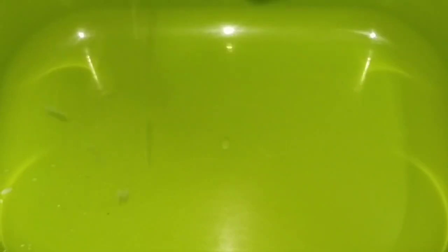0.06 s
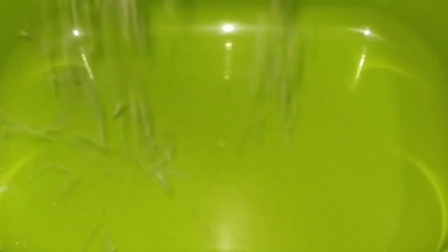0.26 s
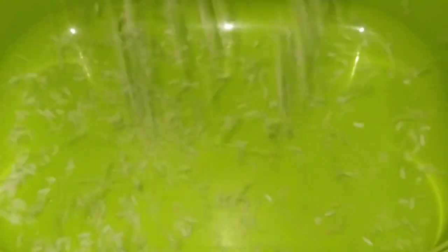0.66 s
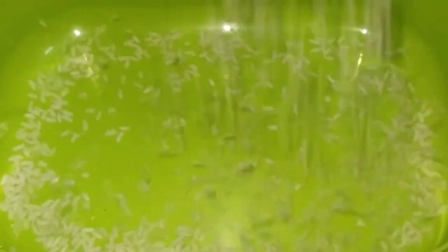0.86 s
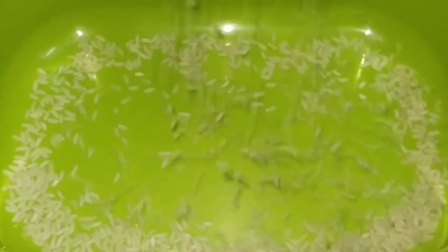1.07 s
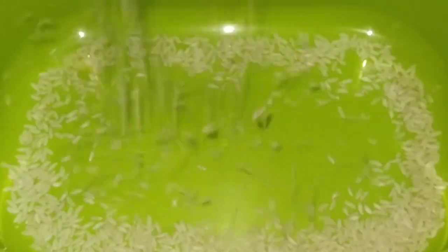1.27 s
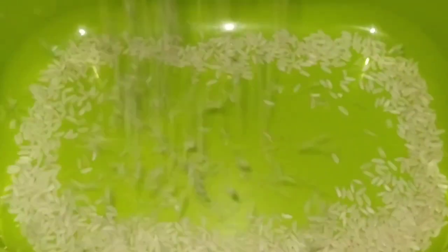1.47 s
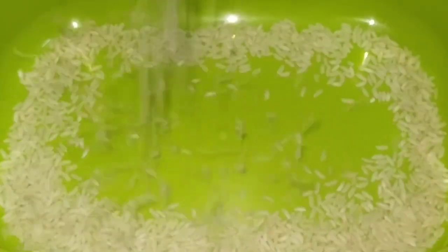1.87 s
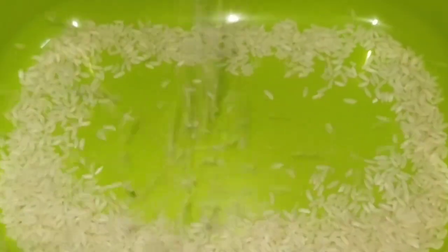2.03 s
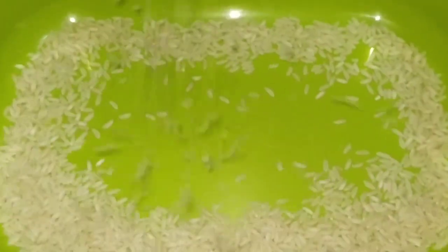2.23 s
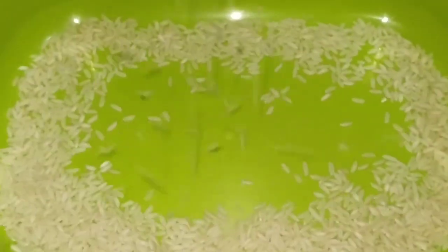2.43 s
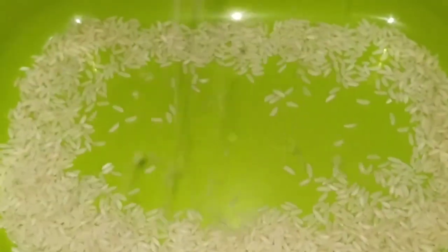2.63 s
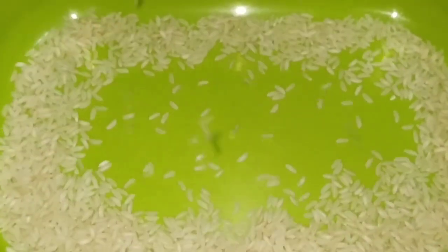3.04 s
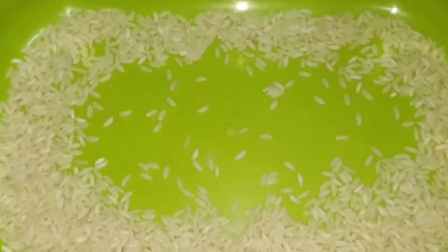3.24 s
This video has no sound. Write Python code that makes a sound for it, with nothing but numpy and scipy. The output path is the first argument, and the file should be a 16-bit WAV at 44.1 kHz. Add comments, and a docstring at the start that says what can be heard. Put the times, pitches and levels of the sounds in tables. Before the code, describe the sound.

Rice grains rattle into a plastic container in a rush that dwindles to separate clicks.

```python
"""A small room: dry rice is poured into a plastic tub, heard from close by.
A few grains tick on the bare bottom, the stream thickens to a rattling rush, then thins to clumps
and stragglers. Each impact clicks and rings the tub's modes, which the growing heap damps.
Grains also click against each other, and the tub takes a few hard knocks.
Underneath are a low room rumble and, late on, a faint hum."""
import sys
import numpy as np
from scipy import signal
from scipy.io import wavfile

SR = 44100
rng = np.random.default_rng(int(sys.argv[2]) if len(sys.argv) > 2 else 0)


def unload_wav(signal):
    """Save mono or channel-first audio to the path in sys.argv[1] as 16-bit WAV at rate SR, clipped to [-1, 1]."""
    wavfile.write(
        sys.argv[1],
        SR,
        np.round(np.clip(np.atleast_2d(signal).T, -1, 1) * 32767).astype(np.int16),
    )


N = 149940
T = np.arange(N) / SR
RING_T = np.arange(6000) / SR

# Room rumble. Each row: frequency in Hz, relative density in dB.
RUMBLE_SPECTRUM = [(25, -35), (70, -15.5), (150, 6.5), (290, -0.5), (1000, -9.5), (3000, -52), (8000, -69)]
# Each row: time in seconds, rumble level in dB.
RUMBLE_LEVEL = [(.03, -95), (.07, -79), (.12, -62.5), (.4, -54.5), (1.2, -64.5), (2.4, -55), (3.4, -52.5)]
# Knocks on the tub. Each row: start in seconds, thud peak in dB, snap peak in dB.
KNOCKS = [(1.456, -17, -40), (1.71, -15, -22), (1.8478, -19, -11), (2.8099, -10.5, -3.5),
          (2.8468, -15, -29)]
# A knock's thud and snap; a soft bump. Each row: frequency in Hz, relative density in dB.
THUD_SPECTRUM = [(30, -75), (150, -17), (650, -0.5), (1000, 4), (2400, -4), (9000, -22)]
SNAP_SPECTRUM = [(2000, -4.5), (5200, -6), (6700, 6), (8600, -19.5), (12200, 5.5), (14000, -14), (15500, 1)]
BUMP_SPECTRUM = [(20, -23), (120, -2), (450, -5), (3000, -48)]
# Each row: frequency in Hz, bare gain in dB, bare T60 in seconds, gain change when filled in dB.
TUB_MODES = [(283.5, -31.5, 0.13, 5), (777, -15, 0.05, -13.5), (1061, -4, 0.023, -2),
             (1275, 1.5, 0.021, -3), (1609, 1.5, 0.015, 2), (1975, 0.5, 0.012, 0.5), (2159, 4, 0.019, -3),
             (2400, 6, 0.0081, 0.5), (2857, 4.5, 0.0096, 1), (3410, -4, 0.011, 0.5),
             (3800, -9.5, 0.013, -6), (5090, -8.5, 0.0066, 1.5), (6350, -5.5, 0.0073, 0)]
# Grain on plastic; hard first contact; grain on grain. Each row: frequency in Hz, relative density in dB.
CLICK_SPECTRUM = [(100, -33), (400, -5), (900, 8.5), (2500, 11.5), (4500, 7), (6700, -3.5), (8200, -8),
                  (11300, -4.5), (15500, -3)]
CONTACT_SPECTRUM = [(550, -23.5), (1200, 3), (2600, 0.5), (6700, -18), (8200, -31), (11500, -21.5)]
RICE_SPECTRUM = [(2000, -9.5), (5000, -13.5), (6500, -14.5), (8200, -21), (10000, -19), (11300, -11),
                 (12500, -18), (15500, -13.5)]
# Grains and small clumps that stand out.
# Each row: start in seconds, peak before the low cut in dB, spot pitch in Hz, contact over ring in dB.
TAPS = [(0.0932, -28.5, 1270, -15), (.169, -24.5, 2770, -10), (.208, -21, 2080, -11),
        (.2135, -17.5, 2220, -7), (.239, -24, 1370, -7), (.25, -20, 1900, -14), (0.293, -28, 1320, 10),
        (.306, -19.5, 1350, 1), (0.335, -16, 1260, -1), (.356, -13.5, 2160, -7), (2.227, -15.5, 1260, 4),
        (2.2865, -9.5, 1390, 2), (2.3504, -22, 1550, 4), (2.4134, -11.5, 1590, 7), (2.554, -21, 1290, -10),
        (2.611, -16, 2080, 0), (2.639, -22, 2050, -7), (2.668, -21, 2150, -10), (2.683, -15, 1590, 3),
        (2.726, -27, 1980, -10), (2.7676, -19, 2160, -11), (2.82, -18.5, 2200, -3), (2.84, -14.5, 1580, 3),
        (2.8575, -14.5, 2700, 4), (2.9373, -16, 2200, -1.5), (2.947, -13, 1960, 8), (2.971, -21, 2150, -2),
        (3.01, -27, 2000, -1), (3.06, -19.5, 2010, -11), (3.0975, -20.5, 2150, -2), (3.113, -21, 1310, -8),
        (3.169, -30, 1670, 3), (3.2082, -24, 2080, 4), (3.2319, -25, 1640, 8), (3.3102, -31.5, 2400, -9),
        (3.33, -22.5, 1340, 5)]
# Stream on the tub; rice on rice. Each row: time in seconds, level before the low cut in dB.
STREAM_LEVEL = [(.24, -105), (.295, -58), (.335, -35), (.365, -29), (.41, -26.5), (.44, -26), (.475, -23.5),
                (.55, -27), (.585, -25), (.62, -27), (.715, -24), (.785, -30), (.82, -27), (.9, -28.5),
                (1.04, -26), (1.33, -29.5), (1.52, -28.5), (1.63, -26), (1.8, -30), (2.04, -29),
                (2.17, -28), (2.26, -31.5), (2.38, -29), (2.44, -33), (2.475, -27), (2.5, -33), (2.58, -37),
                (2.79, -36), (2.86, -29.5), (2.925, -38.5), (2.945, -29.5), (2.99, -30), (3.03, -33),
                (3.11, -39.5), (3.17, -43), (3.28, -51), (3.4, -56)]
RICE_LEVEL = [(.25, -105), (.33, -48), (.55, -48), (1.05, -45.5), (1.4, -49), (2.42, -44.5), (2.7, -51),
              (3.1, -48.5), (3.3, -77)]
# Each row: time in seconds, impacts on the tub per second.
IMPACT_RATE = [(.3, 670), (.45, 1770), (.9, 2000), (1.8, 1490), (2.7, 450), (3.3, 290)]
# Room decay. Each row: frequency in Hz, T60 in seconds.
ROOM_DECAY, ROOM_DB = [(200, 0.1), (2000, 0.57), (8000, 0.87), (16000, 0.038)], -20.5

FILL_START_S, FILL_S, FILL_DAMPING = 0.41, 1.67, 0.13
DETUNE_BARE, DETUNE_FILLED = 0.048, 0.087  # the heap makes pitch depend more on the spot struck
SPOT_HZ, SPOT_SPREAD_OCT, SPOT_WIDTH_OCT, SPOT_DB = 1690, 0.69, 0.14, 6.5


def amp(db):
    """Decibels to gain."""
    return 10 ** (np.asarray(db) / 20)


def unit_rms(x):
    """Scales to rms 1."""
    return x / np.sqrt(np.mean(x ** 2) + 1e-20)


def unit_energy(x):
    """Scales to energy 1."""
    return x / np.linalg.norm(x)


def at_peak(x, db):
    """Scales to a peak level."""
    return amp(db) * x / abs(x).max()


def curve(points):
    """Time table at every sample."""
    return np.interp(T, *np.transpose(points))


def at_hz(points, hz):
    """Table lookup on a log-frequency axis."""
    table_hz, value = np.transpose(points)
    return np.interp(np.log(hz + 1), np.log(table_hz), value)


def add(mix, start_s, sound):
    """Mixes a sound in at a time."""
    part = mix[round(start_s * SR):][:len(sound)]
    part += sound[:len(part)]


def colour(x, spectrum):
    """Minimum-phase filter with the given spectrum."""
    hz = abs(np.fft.fftfreq(2048, 1 / SR))
    log_gain = np.log(amp(at_hz(spectrum, hz)))
    fir = np.fft.ifft(np.exp(np.conj(signal.hilbert(log_gain)))).real
    return signal.fftconvolve(x, fir[:len(fir) // 2])[:len(x)]


def decay(t60_s):
    """Exponential envelope."""
    return np.exp(-np.log(1000) * RING_T / t60_s)


def click(spectrum, t60_s):
    """Coloured noise burst of energy 1."""
    return unit_energy(colour(rng.standard_normal(len(RING_T)) * decay(t60_s), spectrum))


def pulse(spectrum, peak_db):
    """One push: a coloured impulse."""
    return at_peak(colour(signal.unit_impulse(len(RING_T)), spectrum), peak_db)


def background(hum_hz=59.3, hum_db=-72.5, hum_start_s=2, hum_rise_s=.15):
    """Low room rumble and a faint, late hum."""
    rumble = amp(curve(RUMBLE_LEVEL)) * unit_rms(colour(rng.standard_normal(N), RUMBLE_SPECTRUM))
    fade_in = np.clip((T - hum_start_s) / hum_rise_s, 0, 1)
    hum = fade_in * unit_rms(np.sin(2 * np.pi * hum_hz * T))
    return rumble + amp(hum_db) * hum


def room(x):
    """Diffuse tail; the bass and the very top die first."""
    hz, t, noise = signal.stft(rng.standard_normal(SR // 2), SR, nperseg=256)
    t60_s = at_hz(ROOM_DECAY, hz)[:, None]
    tail = signal.istft(noise * np.exp(-np.log(1000) * t / t60_s), SR)[1]
    return signal.fftconvolve(x, unit_energy(tail))[:N]


def knocks(bump_s=.2502, bump_db=-30.5):
    """Hard knocks, each a dull thud and a bright snap, and one soft bump of the whole tub."""
    out = np.zeros(N)
    for start_s, thud_db, snap_db in KNOCKS:
        add(out, start_s, pulse(THUD_SPECTRUM, thud_db) + pulse(SNAP_SPECTRUM, snap_db))
    add(out, bump_s, pulse(BUMP_SPECTRUM, bump_db))
    return out


def tub_ring(spot_hz, time_s, rise_s=0.00065):
    """The tub's modes: the spot struck favours those near one pitch, and the heap damps them."""
    fill = np.clip((time_s - FILL_START_S) / FILL_S, 0, 1)
    hz, bare_db, t60_s, fill_change_db = np.transpose(TUB_MODES)[:, :, None]
    shift, phase = rng.uniform(-1, 1, (2, len(TUB_MODES), 1))
    detune = DETUNE_BARE + (DETUNE_FILLED - DETUNE_BARE) * fill
    spot_db = SPOT_DB * np.exp(-(np.log2(hz / spot_hz) / SPOT_WIDTH_OCT) ** 2)
    gain = amp(bare_db + fill_change_db * fill + spot_db)
    envelope = gain * decay(t60_s / (1 + FILL_DAMPING * fill))
    modes = envelope * np.sin(2 * np.pi * hz * (1 + detune * shift) * RING_T + np.pi * phase)
    attack = 1 - np.exp(-RING_T / rise_s)
    return unit_energy(modes.sum(0) * attack)


def grain_impact(spot_hz, time_s, click_db=-11):
    """One grain on plastic: the ring and a scratchy click."""
    return tub_ring(spot_hz, time_s) + amp(click_db) * click(CLICK_SPECTRUM, t60_s=.0065)


def taps(mean_bounce_s=0.00254, bounce_db=-9.5):
    """Lone or hard-landing grains: each hits on its tip, then falls flat."""
    out = np.zeros(N)
    contact = unit_energy(pulse(CONTACT_SPECTRUM, 0))
    for start_s, db, spot_hz, contact_db in TAPS:
        tip = tub_ring(spot_hz, start_s) + amp(contact_db) * contact
        add(out, start_s, at_peak(tip, db))
        flat_s = start_s + mean_bounce_s * (.5 + rng.random())
        add(out, flat_s, at_peak(grain_impact(spot_hz, start_s), db + bounce_db))
    return out


def shower(rate_per_s, stages, size_spread_db=3):
    """Impacts of random time and size, each a sound from its stage of the pour; rms near 1."""
    size = amp(size_spread_db * np.clip(rng.standard_normal(N), -2, 2))
    lands = rng.random(N) < rate_per_s / SR
    train = unit_rms(size * lands / np.sqrt(rate_per_s)) * rng.choice([-1, 1], N)
    pick = rng.integers(0, len(stages[0]), N)
    out = np.zeros(N)
    for at in np.flatnonzero(train):
        sounds = stages[at * len(stages) // N]
        add(out, at / SR, train[at] * sounds[pick[at]])
    return out


def stream(clump_s=0.0057, clump_db=1.18, rice_clicks_per_impact=2.6):
    """Rice arrives in clumps, rattling the tub and clicking against the grains already there."""
    window = np.hanning(int(2 * clump_s * SR))
    clumps = unit_rms(signal.oaconvolve(rng.standard_normal(N), window, "same"))
    rate_per_s = curve(IMPACT_RATE)
    spots_hz = SPOT_HZ * 2 ** (SPOT_SPREAD_OCT * np.linspace(-1, 1, 40))
    stages = [[grain_impact(hz, span.mean()) for hz in spots_hz] for span in np.array_split(T, 7)]
    on_tub = amp(curve(STREAM_LEVEL)) * shower(rate_per_s, stages)
    clicks = [click(RICE_SPECTRUM, t60_s=0.0077) for _ in range(48)]
    on_rice = amp(curve(RICE_LEVEL)) * shower(rate_per_s * rice_clicks_per_impact, [clicks])
    return unit_rms(amp(clump_db * clumps)) * (on_tub + on_rice)


def scene(low_cut_hz=158):
    """Pour, room and background; the pour's deep bass is cut away."""
    low_cut = signal.butter(2, low_cut_hz, "highpass", fs=SR, output="sos")
    pour = signal.sosfilt(low_cut, stream() + taps()) + knocks()
    return (pour + amp(ROOM_DB) * room(pour) + background())[None]


def record(dry, cutoff_hz=15600):
    """Steep low-pass."""
    fir = signal.firwin(401, cutoff_hz, window=("kaiser", 9), fs=SR)
    return signal.oaconvolve(dry, fir[None], "same")


dry = scene()
out = record(dry)
unload_wav(out)
```